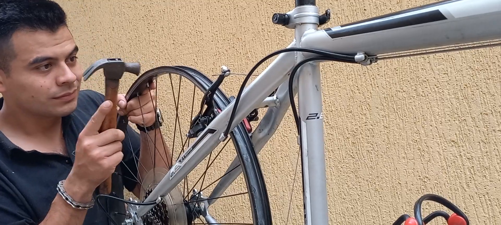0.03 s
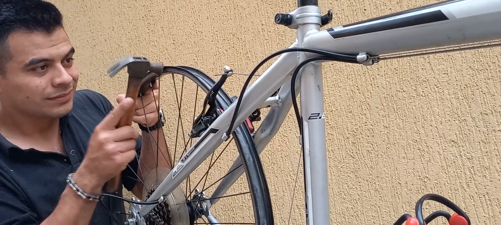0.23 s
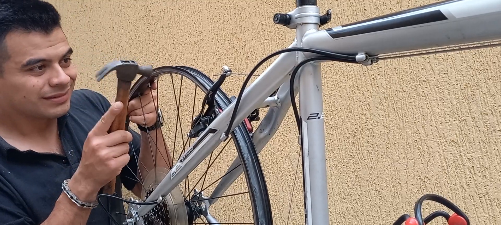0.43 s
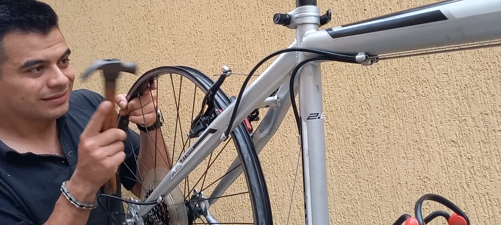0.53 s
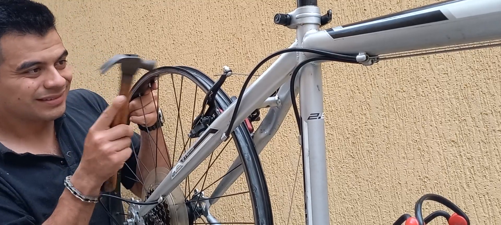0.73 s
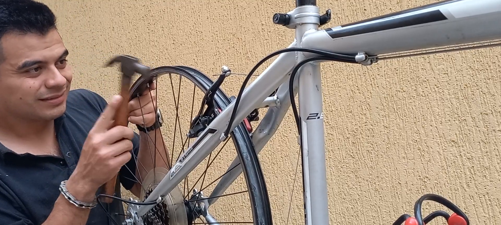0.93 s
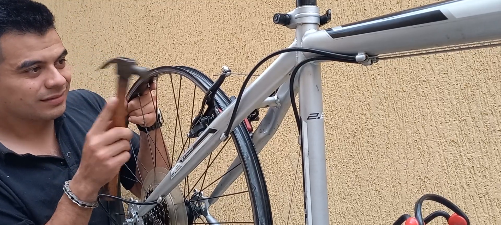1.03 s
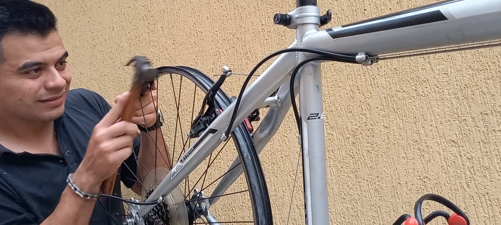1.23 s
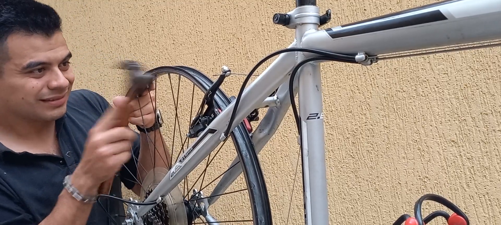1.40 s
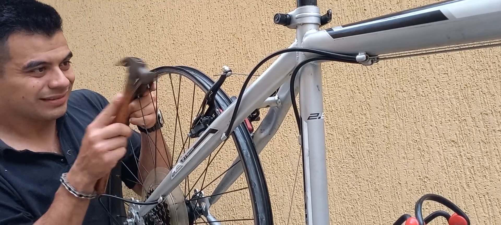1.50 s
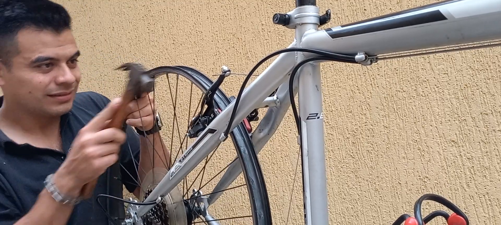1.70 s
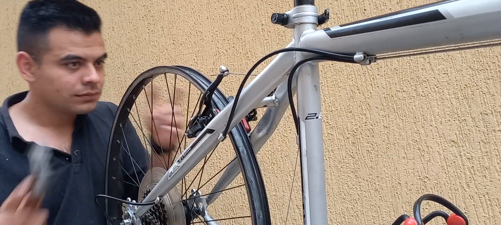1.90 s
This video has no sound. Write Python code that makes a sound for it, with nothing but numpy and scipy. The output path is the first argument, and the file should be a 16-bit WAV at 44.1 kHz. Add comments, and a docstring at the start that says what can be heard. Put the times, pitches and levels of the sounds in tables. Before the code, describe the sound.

A steel hammer taps a bicycle wheel rim in a hard-walled, echoing space. An earlier blow's echo is fading at the start. The loudest tap lands at about 0.2 seconds, followed by others at 0.7 and 1.2, then quicker ones at 1.4 and 1.6. Each is a sharp crack with a ping and short clank, after which rim and spokes ring faintly. A very faint low rumble lies underneath.

```python
"""A hard-walled, echoing space: a steel hammer taps the rim of a bicycle wheel steadied by a hand.
Each blow is a crack, a ping of steel and a short clank of the damped rim; rim and spokes ring on
faintly and the walls answer. The echo of an earlier blow is still fading at the start.
A faint low rumble lies underneath."""
import sys
import numpy as np
from scipy import signal
from scipy.fft import rfft, irfft
from scipy.io import wavfile
from scipy.ndimage import map_coordinates

SR = 44100
rng = np.random.default_rng(int(sys.argv[2]) if len(sys.argv) > 2 else 0)


def master_out(mix):
    """Clip the mix to full scale and print it as 16-bit PCM to the path in sys.argv[1]."""
    frames = np.transpose(np.atleast_2d(mix))
    ceiling = np.clip(frames, -1, 1)
    pcm = np.round(ceiling * 32767).astype(np.int16)
    wavfile.write(sys.argv[1], SR, pcm)


N = 85995
BLOW_N = int(1.5 * SR)
TIME_S = np.arange(BLOW_N) / SR
FREQ_HZ = np.fft.rfftfreq(BLOW_N, 1 / SR)


def amp(db):
    return 10 ** (np.asarray(db) / 20)


def unit_rms(x):
    return x / np.sqrt(np.mean(np.abs(x) ** 2) + 1e-20)


def curve_at(points, hz):
    """Interpolate (freq_hz, value) points on a log frequency axis."""
    knots_hz, values = np.transpose(points)
    return np.interp(np.log(hz + 1), np.log(knots_hz + 1), values)


def pan(left_db):
    return amp([[left_db], [-left_db]])


def noise(spectrum, coherence, size):
    """Coloured stereo noise, rms 1, with the given left-right coherence."""
    hz = np.fft.rfftfreq(size, 1 / SR)
    width_rad = np.arccos(np.clip(curve_at(coherence, hz), -1, 1)) / 2
    coloured = rfft(rng.standard_normal((2, size))) * amp(curve_at(spectrum, hz))
    mid, side = irfft(coloured * [np.cos(width_rad), np.sin(width_rad)], size)
    return unit_rms(np.array([mid + side, mid - side]))


def wobble(knots_per_s):
    """A smooth random curve for each ear."""
    position = [TIME_S * knots_per_s]
    return np.array([map_coordinates(rng.standard_normal(256), position, mode="wrap") for _ in range(2)])


def ring(modes, spread_rad, rise_s, detune=0):
    """Decaying modes whose phase at each ear wavers as the room carries them."""
    out = np.zeros((2, BLOW_N))
    for pitch_hz, level_db, t60_s in modes:
        phase = rng.uniform(0, 2 * np.pi)
        ear_offset = rng.choice([-.5, .5]) * np.array([[1], [-1]])
        phase += spread_rad * (ear_offset + .55 * wobble(knots_per_s=20))
        pitch_hz *= 1 + detune * rng.standard_normal()
        level_db += rng.standard_normal()
        out += amp(level_db - 60 * TIME_S / t60_s) * np.sin(2 * np.pi * pitch_hz * TIME_S + phase)
    return out * (1 - np.exp(-TIME_S / rise_s))


# Background spectrum: freq_hz, level_db
RUMBLE_SPECTRUM = [(20, -40), (40, -29.5), (65, 1), (110, 4.5), (180, 2), (300, -8), (600, -7),
                   (2000, -29.5), (6000, -39), (15000, -38.5)]
# Left-right likeness of the room sound: freq_hz, coherence
ROOM_COHERENCE = [(60, .92), (140, 0.94), (280, 0.95), (520, 0.48), (1000, 0.032), (3000, 0),
                  (15000, 0.026)]


def rumble():
    """Steady low background noise."""
    return noise(RUMBLE_SPECTRUM, ROOM_COHERENCE, N)


# Echo spectrum: freq_hz, level_db
ECHO_SPECTRUM = [(24, -75), (40, -52), (117, -8.5), (170, -11.5), (241, -5), (294, -9.5), (342, -3.5),
                 (417, -9), (449, -5), (484, -11.5), (637, -7.5), (859, -8), (1310, -6), (1680, -5),
                 (1960, -2), (2110, -6), (2330, -6), (2640, -8), (4030, -8.5), (5300, -10.5), (6980, -18),
                 (8520, -13.5), (10700, -17.5), (12100, -12.5), (15500, -19)]
# Echo decay: freq_hz, t60_s
ECHO_DECAY = [(100, 1.01), (260, 1.22), (700, 0.83), (1900, 0.79), (4800, 0.67), (7000, .54), (13000, 0.39),
              (16000, 0.32)]
# Echo build-up: freq_hz, rise_s
ECHO_RISE = [(110, 0.028), (250, 0.0067), (700, 0.0044), (3000, 0.0031), (12000, 0.0091)]


def wall_echo():
    """The walls answer one blow: the bass builds slowly and lasts longest; the tail falls ever faster."""
    bend_db_per_s2 = 38
    hz, t, bands = signal.stft(noise(ECHO_SPECTRUM, ROOM_COHERENCE, BLOW_N), SR, nperseg=256)
    decay = amp(-60 * t / curve_at(ECHO_DECAY, hz)[:, None] - bend_db_per_s2 * t ** 2)
    rise = 1 - np.exp(-t / curve_at(ECHO_RISE, hz)[:, None])
    _, echo = signal.istft(bands * decay * rise, SR, nperseg=256)
    return echo[:, :BLOW_N] * pan(left_db=.2)


# Spoke and wheel modes: pitch_hz, level_db, t60_s
SPOKE_MODES = [(166, -4, .6), (239, 3, .7), (273, -4, .9), (331, -4, 1.2), (347, 0, 1.5), (374, -3, 1.5),
               (396, -8, 1.4), (407, -3, .9)]


def spoke_ring():
    """Spokes and wheel hum on after the blow."""
    return ring(SPOKE_MODES, spread_rad=.35, rise_s=.01)


# Lasting rim modes: pitch_hz, level_db, t60_s
RIM_MODES = [(1201, -5, .55), (1338, -3, .55), (1652, -5, .5), (1767, -7, .65), (1895, -5, .8),
             (1935, 0, .7), (1981, -1, .75), (2004, -2, .7), (2255, -5, .65), (2297, -4, .65),
             (2863, -4, .5), (4107, -7, .45), (4925, -7, .35), (5207, -9, .35)]


def rim_ring():
    """The rim modes that outlast the hand's damping."""
    return ring(RIM_MODES, spread_rad=1, rise_s=.01)


# High contact modes: pitch_hz, level_db, t60_s
PING_MODES = [(4930, -1, .03), (5150, -1, .028), (8400, -5, .022), (9450, -9, .02), (11750, -6, .02),
              (12800, -8, .02)]


def steel_ping():
    """Steel pings on the rim's edge."""
    return ring(PING_MODES, spread_rad=1.2, rise_s=.00063)


# Hand-damped rim modes: pitch_hz, level_db, t60_s
CLANK_MODES = [(313, -9, 0.092), (606, -9, 0.015), (856, 0.5, 0.028), (1296, 4, 0.043), (1626, 1.5, 0.037),
               (1900, -4.5, 0.03), (2247, 0.5, .025), (2840, 3.5, 0.028), (3770, -3, 0.031)]


def rim_clank():
    """The struck rim dies quickly under the hand; pitches vary slightly per blow."""
    return ring(CLANK_MODES, spread_rad=1.2, rise_s=.00063, detune=.018)


def minimum_phase(gain):
    """The causal frequency response with this gain."""
    cepstrum = irfft(np.log(np.maximum(gain, 1e-6)))
    folded = np.concatenate([cepstrum[:1], 2 * cepstrum[1:len(cepstrum) // 2]])
    return np.exp(rfft(folded, len(cepstrum)))


# Contact spectrum: freq_hz, level_db
CRACK_SPECTRUM = [(40, -24.5), (150, -31), (400, 2), (1500, 3.5), (3200, 0.5), (5300, -1.5), (6600, -5),
                  (8400, 1), (10300, -5), (11800, -0.5), (13500, -9.5), (15500, -1.5)]
# Left-right likeness of the early scatter: freq_hz, coherence
SCATTER_COHERENCE = [(100, 0.85), (500, 1), (1500, 0.46), (5000, 0.25), (15000, 0.13)]


def crack():
    """The first wave of the contact and its scatter off wheel, frame and wall."""
    t60_s, rise_s, right_lag_s = .029, .0009, .00003
    white = noise([(1, 0)], SCATTER_COHERENCE, BLOW_N)
    scatter = white * amp(-60 * TIME_S / t60_s) * (1 - np.exp(-TIME_S / rise_s))
    ear_delay = np.exp(-2j * np.pi * FREQ_HZ * np.array([[0], [right_lag_s]]))
    first_wave = .29 * np.linalg.norm(scatter[0]) * ear_delay
    response = minimum_phase(unit_rms(amp(curve_at(CRACK_SPECTRUM, FREQ_HZ))))
    return irfft((rfft(scatter) - first_wave) * response, BLOW_N)


def contact_tone(blow, bass_db, middle_db, treble_db):
    """Where and how squarely the hammer lands tilts the tone of the blow."""
    bass_hz, middle_hz, middle_octaves, treble_hz = 400, 2400, .52, 4200
    bass = 1 / (1 + (FREQ_HZ / bass_hz) ** 2)
    middle = np.exp(-(np.log2((FREQ_HZ + 1) / middle_hz) / middle_octaves) ** 2)
    treble = 1 - 1 / (1 + (FREQ_HZ / treble_hz) ** 4)
    gain = amp(bass_db * bass + middle_db * middle + treble_db * treble)
    return irfft(rfft(blow) * minimum_phase(gain), BLOW_N)


# Blows, with relative levels:
# start_s, level_db, direct_db, bass_db, middle_db, treble_db, rim_db, spoke_db, ping_db, crack_db
HAMMER_BLOWS = [(-.29, 4, 0, -3, -1.5, 0, -10, 1, 0, 0), (.2191, 3, -3, -3, -0.5, 3, -0.5, 0, 1.5, 0.5),
                (.6738, -0.42, -1, 0, 0.5, 2, -2, 1.5, 3, -2),
                (1.1721, 0.5, -4.5, -2.5, 3.5, 0.5, 0.5, -6, -9.5, -2.5),
                (1.442, -0.26, -1.5, 2, 1.5, 2.9, 6.5, -12, 2, 1.5),
                (1.6051, 0, 1, 0.5, 1.5, 2.5, 3.5, -3, -6, 0.5)]


def hammer():
    """Every blow sounds rim, spokes and room."""
    lead_n = SR  # holds the blow before time zero
    out = np.zeros((2, lead_n + N + BLOW_N))
    for start_s, level_db, direct_db, *tone_db, rim_db, spoke_db, ping_db, crack_db in HAMMER_BLOWS:
        direct = amp(crack_db - 11.5) * crack() + amp(-19) * rim_clank()
        direct += amp(ping_db - 17.5) * steel_ping()
        direct *= amp(direct_db) * pan(left_db=1.5)
        blow = contact_tone(direct + amp(-19.5) * wall_echo(), *tone_db)
        blow += amp(rim_db - 36.5) * rim_ring()
        blow += amp(spoke_db - 40) * spoke_ring()
        onset = lead_n + round(start_s * SR)
        out[:, onset:onset + BLOW_N] += amp(level_db) * blow
    return out[:, lead_n:lead_n + N]


def scene():
    """The hammering over a faint rumble."""
    return hammer() + amp(-57.5) * rumble()


def record(dry):
    """Steep low-pass at the top of the treble."""
    cutoff_hz = 15900
    return signal.sosfilt(signal.ellip(12, .1, 90, cutoff_hz, fs=SR, output="sos"), dry)


dry = scene()
out = record(dry)
master_out(out)
```